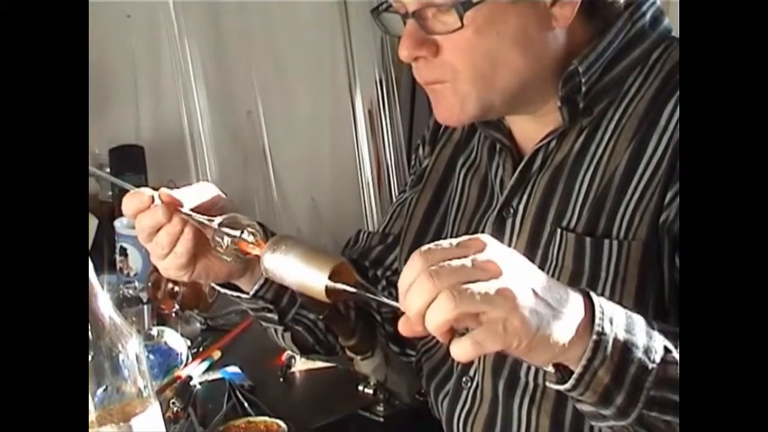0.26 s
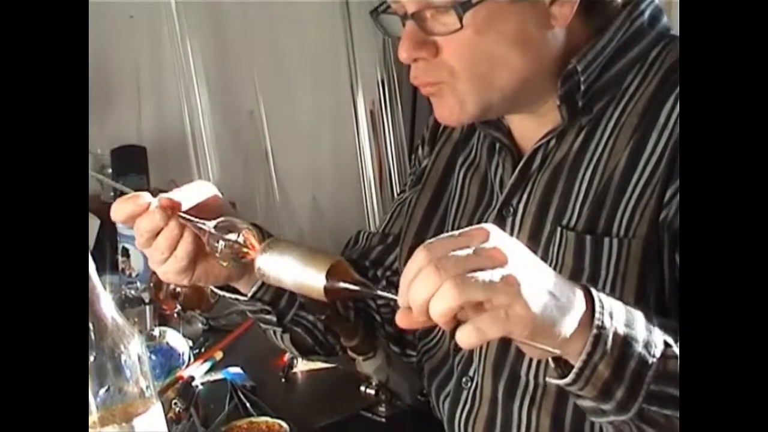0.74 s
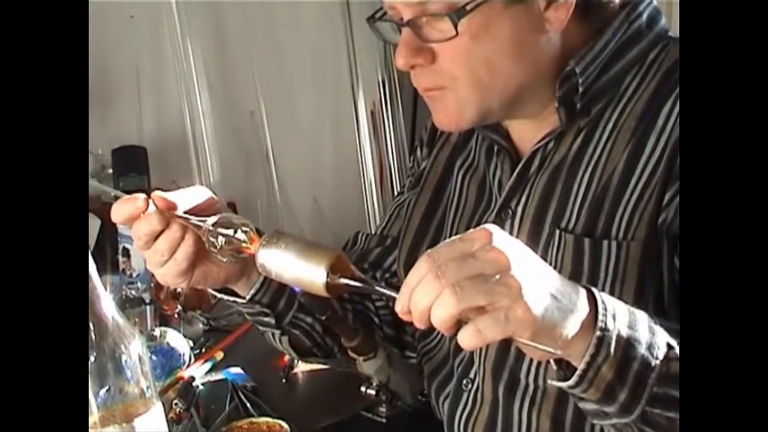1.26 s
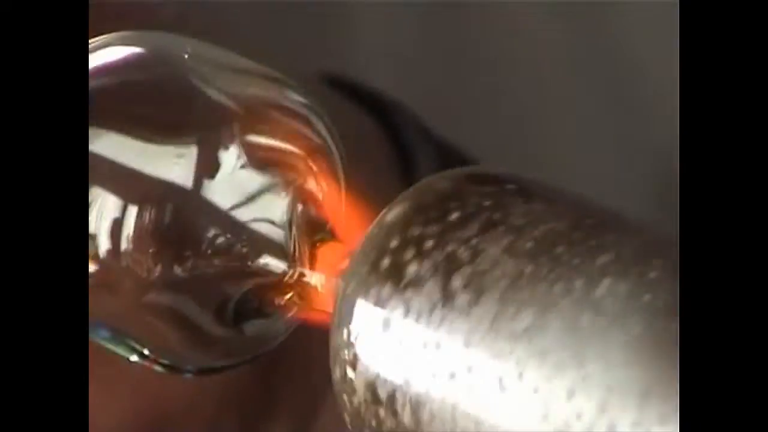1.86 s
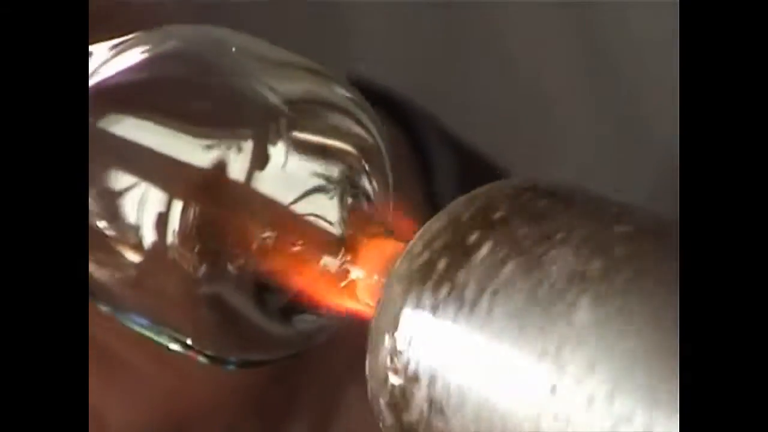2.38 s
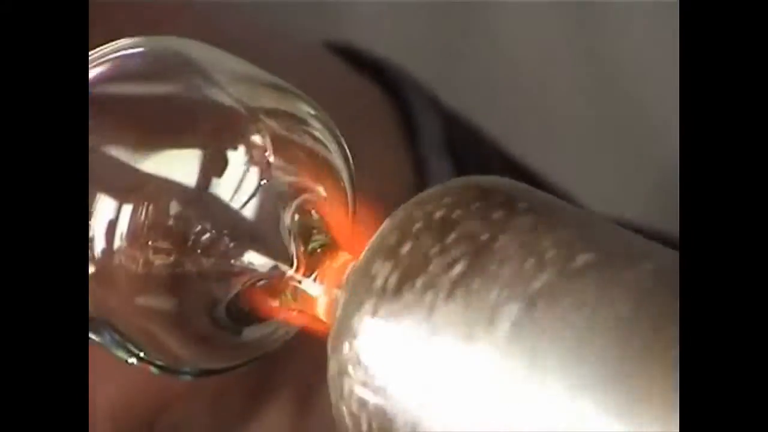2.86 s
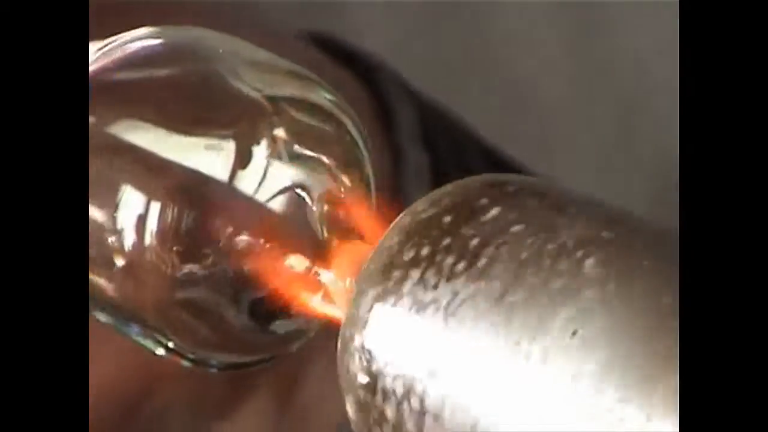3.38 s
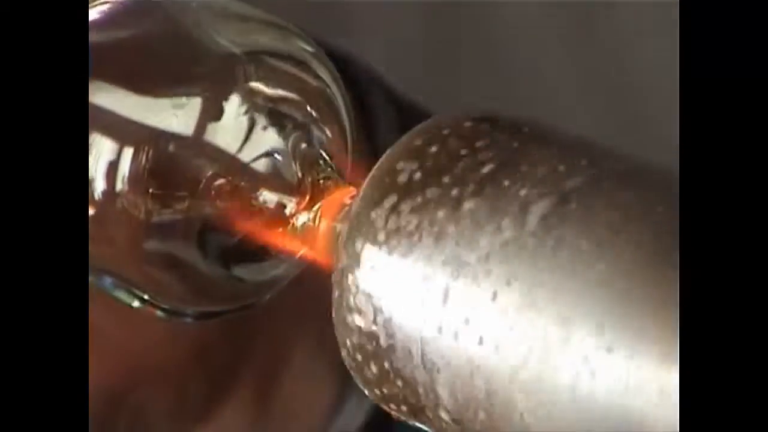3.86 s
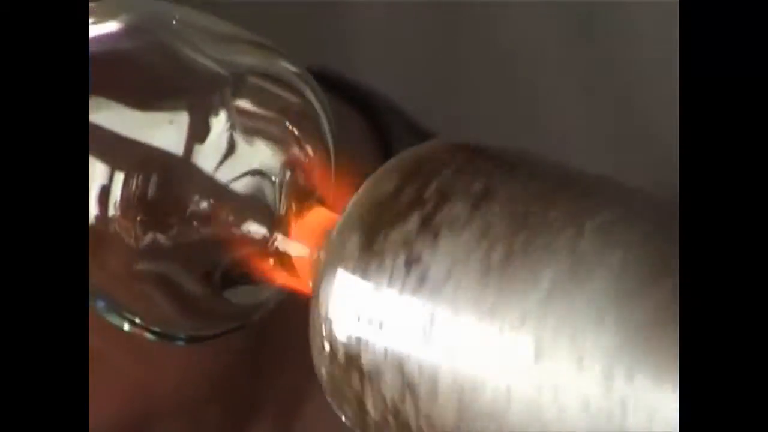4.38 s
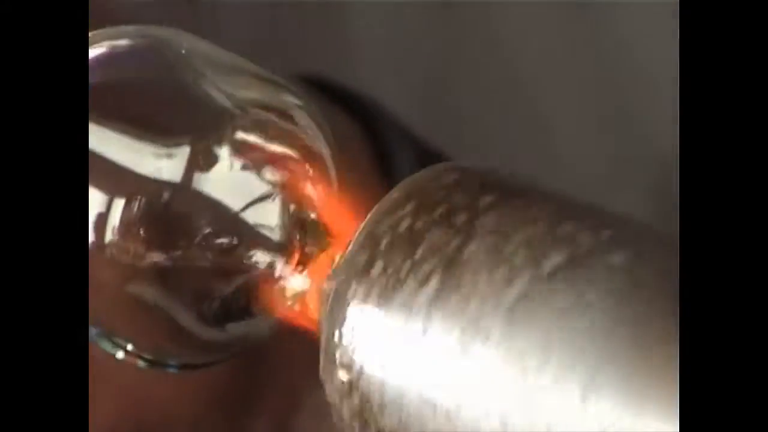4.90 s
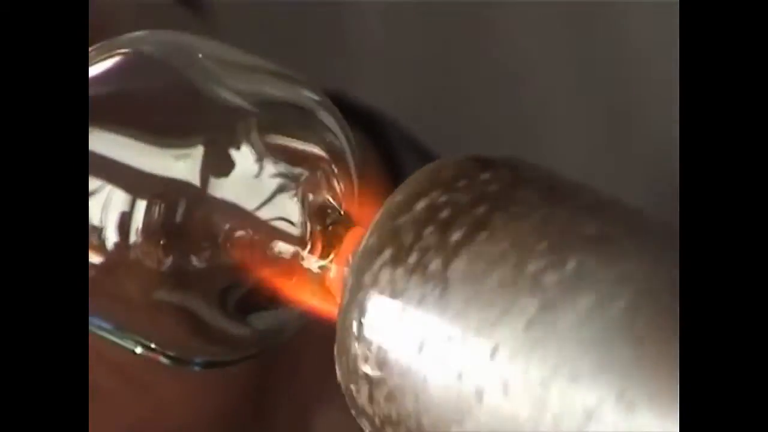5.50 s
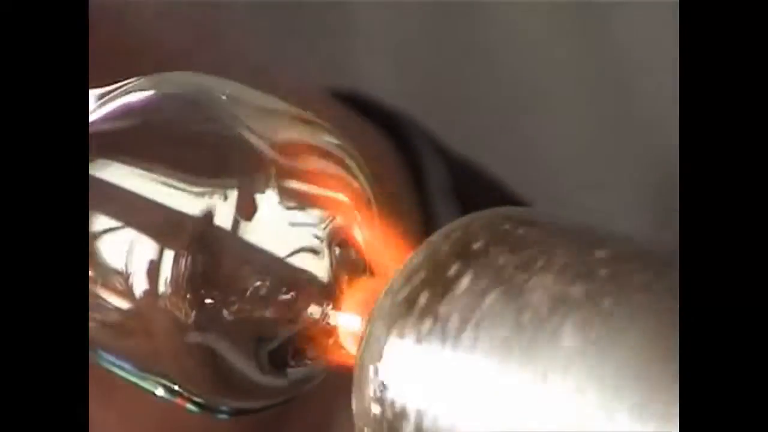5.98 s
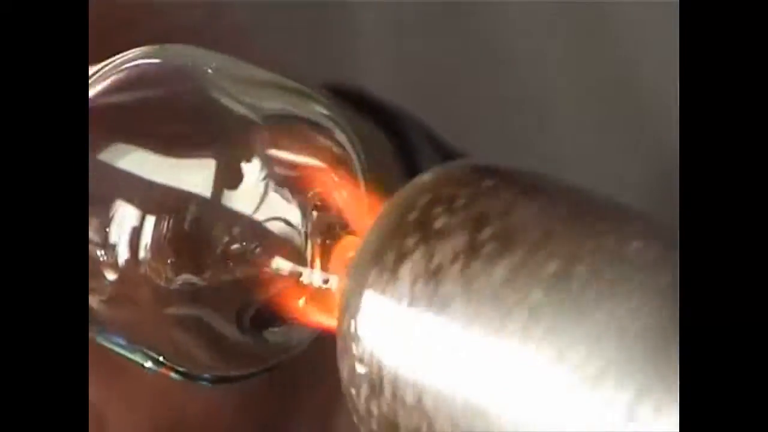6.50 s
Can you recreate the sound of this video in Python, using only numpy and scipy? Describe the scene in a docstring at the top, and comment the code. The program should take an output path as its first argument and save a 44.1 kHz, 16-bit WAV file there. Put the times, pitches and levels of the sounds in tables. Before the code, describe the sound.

A bench torch burns close by in a small workshop. For the first half second the flame flutters in uneven, low, breathy puffs, then stops fluttering and leaves a clean gas hiss. The hiss grows evenly until nearly two seconds and stays steady, bright and slightly whistly, over a very soft low roar. Two faint glassy touches and a tiny flare pass within it. Close stereo microphones.

```python
"""Gas torch on a glass bulb

A bench torch plays on a glass bulb in a small workshop, close to two microphones.
The flame flutters for half a second: noise bands lifted by puffs. Then it burns clean: jets hiss as shaped noise
and ring the cavities of torch head and glass over a soft low roar; their level rises evenly, then stays steady.
The flame splits on the turning bulb as two trading noise bands. Short noise swells make the flares;
two grazing touches ring the glass faintly as wandering sines."""
import sys
import numpy as np
from scipy import signal
from scipy.fft import rfft, irfft
from scipy.io import wavfile
from scipy.ndimage import uniform_filter1d

SR = 44100
rng = np.random.default_rng(int(sys.argv[2]) if len(sys.argv) > 2 else 0)


def store_pcm(level_fs):
    """Save levels as 16-bit WAV."""
    pcm = np.round(np.clip(level_fs, -1, 1) * 32767).astype(np.int16)
    wavfile.write(sys.argv[1], SR, np.atleast_2d(pcm).T)


N = 297407
T = np.arange(N) / SR
HZ = np.maximum(np.arange(N // 2 + 1) * SR / N, 1)
TOP_HZ = 15620


def undb(db):
    """Decibels to gain."""
    return 10 ** (np.asarray(db) / 20)


def unit(x):
    """Scale to rms 1."""
    return x / np.sqrt(np.mean(x ** 2))


def across(points):
    """(frequency [Hz], value) points joined on a log-frequency axis."""
    hz, value = np.transpose(points)
    return np.interp(np.log(HZ), np.log(hz), value)


def resonances(modes):
    """Gain of steep-skirted (frequency [Hz], width [Hz], level [dB]) modes, summed in power."""
    power = 0
    for hz, width_hz, db in modes:
        offset = (HZ - hz) / (0.86 * width_hz)
        power = power + (undb(db) / (1 + offset ** 2)) ** 2
    return np.sqrt(power)


def walk(rate_hz):
    """Smooth random drift: noise low-passed to half gain at rate_hz; rms 1."""
    spectrum = rfft(rng.standard_normal(N))
    return unit(irfft(spectrum / (1 + (HZ / rate_hz) ** 4), N))


def ramp(start_s, length_s):
    """An even rise from 0 to 1."""
    return np.clip((T - start_s) / length_s, 0, 1)


def swell(top_s, length_s):
    """A Gaussian bump in time, down to 1/e at length_s either side."""
    return np.exp(-((T - top_s) / length_s) ** 2)


def surge(start_s, rise_s, length_s):
    """A quick rise from start_s, then a Gaussian fall."""
    return ramp(start_s, rise_s) * swell(start_s + rise_s, length_s)


def reflections(t60_s, share, full_hz=2500):
    """Fine spectral ripple that echoes from bench and walls put on the treble at each microphone."""
    tail = rng.standard_normal((2, N)) * undb(-60 * T / t60_s) * (T > .002)
    tail /= np.sqrt(np.sum(tail ** 2, axis=1, keepdims=True))
    echo = share * np.minimum(HZ / full_hz, 1) ** .5
    return np.abs(1 + echo * rfft(tail)) / np.sqrt(1 + echo ** 2)


# phase by which the left microphone leads: (frequency [Hz], lead [rad])
LEAD = [(60, 0.5), (250, -1), (500, -1.1), (1000, 0.56), (1650, -1), (1850, 0), (5900, -1), (6700, 1),
        (7450, 0.5), (8600, 0.44), (9600, 0), (10500, 1.4), (11900, 2), (12700, 2.5), (13600, -0.5),
        (15500, -1)]


def turbulence(colour, likeness, pan_db):
    """Stereo noise of given colour, left-right likeness (-1..1) and left-minus-right level; rms 1."""
    mid, side = rfft(rng.standard_normal((2, N)))
    likeness = np.clip(likeness, -.98, .98)
    sign = np.array([[1], [-1]])
    pair = np.sqrt(1 + likeness) * mid + sign * np.sqrt(1 - likeness) * side
    balance = undb(sign * pan_db / 2)
    phase = np.exp(1j * sign * across(LEAD) / 2)
    return unit(irfft(pair * colour * balance * phase, N))


# spectrum shape of the unsteady flame's rumble: (frequency [Hz], relative density [dB per Hz])
RUMBLE = [(20, -5), (60, -2), (130, -8), (175, 0.5), (290, -3), (400, -5), (600, -14), (1000, -19.5),
          (2000, -48)]
# strongest puffs of the unsteady flame: (start [s], fall to 1/e [s], lift before growth [dB])
PUFFS = [(0.053, 0.028, 2.5), (0.12, 0.07, 3.5), (0.205, 0.05, -0.8), (0.286, 0.047, 4),
         (0.322, 0.057, 3.5), (0.364, 0.09, 4.5)]
PUFF_RISE_S = 0.006
FLUTTER_DB, FLUTTER_ATTACK_S, FLUTTER_END_S, FLUTTER_RELEASE_S = -57, 0.1, 0.498, 0.022
FLUTTER_SINKS_S, FLUTTER_SINK_DB_PER_S = 0.39, 43
# growth: dB gained per dB of puff lift
RAGGED_DB, RAGGED_GROWTH = -63, 2.2
BASS_DB, BASS_TOP_S, BASS_LENGTH_S = -62, 0.25, 0.11


def flutter(throb_db=1.6, rumble_growth=0.82, sputter_db=1.0):
    """The flame burns in sudden puffs, the stronger the brighter, heaves in the bass, sinks and stops."""
    lift_db = sum(db * surge(s, PUFF_RISE_S, length_s) for s, length_s, db in PUFFS)
    sink_db = FLUTTER_SINK_DB_PER_S * np.maximum(T - FLUTTER_SINKS_S, 0)

    rumble_likeness = across([(30, .5), (130, 0.97), (600, 0.87)])
    rumble_pan_db = across([(60, 6.5), (200, 3.9)])
    rumble = turbulence(undb(across(RUMBLE)), rumble_likeness, rumble_pan_db)
    rumble = rumble * undb(FLUTTER_DB + rumble_growth * lift_db - sink_db)

    ragged_shape_db = across([(300, -25), (600, -10), (1500, -7), (2500, -9), (5000, -12), (15000, -47)])
    ragged = turbulence(undb(ragged_shape_db), likeness=0.54, pan_db=3.0)
    ragged = ragged * undb(RAGGED_DB + RAGGED_GROWTH * lift_db + sputter_db * walk(70))

    bass = turbulence(resonances([(65, 50, 0)]), likeness=0.7, pan_db=6.5)
    bass = bass * undb(BASS_DB) * swell(BASS_TOP_S, BASS_LENGTH_S)

    attack = np.interp(T, [0, FLUTTER_ATTACK_S], [.4, 1])
    release = 1 - ramp(FLUTTER_END_S - FLUTTER_RELEASE_S, FLUTTER_RELEASE_S)
    return (rumble + ragged + bass) * undb(throb_db * walk(38)) * attack * release


# spectrum shape of the jets: (frequency [Hz], relative density [dB per Hz])
HISS = [(250, -35.5), (450, -21), (700, -19), (1400, -12.5), (1760, -10), (1970, -7), (2300, -8.5),
        (3200, -10), (5000, -6.5), (7000, -5), (9000, -6.5), (12000, -8), (13500, -9.5), (14800, -17.5),
        (15600, -12.5)]
# resonances of torch head, glass and bench: (frequency [Hz], width [Hz], relative level [dB])
CAVITIES = [(528, 22, -17.5), (766, 20, -12), (857, 10, -15), (942, 10, -8.3), (1040, 10, -10),
            (1072, 26, -9), (1115, 28, -11), (1287, 14, -9.5), (1370, 50, -9.5), (1462, 36, -8.5),
            (1589, 30, -13), (1786, 14, -10), (1888, 30, -6.3), (1966, 36, -1.2), (2033, 24, 0.5),
            (2152, 44, -3.2), (2304, 35, -7.5), (2632, 36, -1.8), (2810, 60, -4.8), (3015, 40, -5.8),
            (3186, 22, 0.5), (3308, 32, -1.8), (3490, 28, -2.5), (3565, 35, -5.5), (4030, 56, -2),
            (4378, 56, -4.6), (4554, 36, -5.4), (4711, 38, -4.2), (5290, 130, -9), (5850, 90, -8),
            (6020, 110, -2.5), (6390, 70, -7), (6800, 32, -0.5), (6955, 42, -2), (7026, 24, -4),
            (7260, 90, -3.2), (7385, 30, -2), (7554, 30, -5), (7721, 26, -5.5), (7848, 53, -2.6),
            (8328, 77, -4.6), (10444, 110, -5.8), (11586, 300, -10), (12180, 260, -8.5), (13320, 260, -11)]
# left-right likeness of the hiss: (frequency [Hz], likeness [-1..1])
LIKENESS = [(400, 0.66), (1350, 0.68), (1720, 0.16), (1950, 0.88), (2400, 0.73), (2800, 0.33), (3800, 0.86),
            (4700, 0.67), (6500, 0.57), (8600, 0.18), (9900, 0.48), (11000, 0.18), (12100, 0.38),
            (14000, 0.22), (15500, 0.41)]
# left-right balance of the jets: (frequency [Hz], left minus right [dB])
SIDES = [(60, 4), (110, 18), (200, 10), (380, 1.5), (700, 3.5), (1290, 3.5), (2380, 0), (4400, 1),
         (8120, 2.5), (15000, -1)]


def jets(room, ring_db=-4.0, tremble_db=0.5, ring_waver_db=0.52):
    """Gas hisses from the nozzles and rings the cavities nearby; both tremble together."""
    pan_db = across(SIDES)
    hiss = turbulence(undb(across(HISS)) * room, across(LIKENESS), pan_db)
    ring = turbulence(resonances(CAVITIES), likeness=0.78, pan_db=pan_db)
    ring = ring * undb(ring_db + ring_waver_db * walk(22.0))
    return unit(hiss + ring) * undb(tremble_db * walk(40))


# where the flame meets the bulb: (time [s], aim [0 = spread on its face, 1 = split on its edge])
AIM = [(0, .15), (1.65, 0.089), (2.1, 0.95), (2.9, 1.5), (5.2, 1.34), (5.5, 0.13), (6.74, 0.83)]
# the turning bulb wobbles through the flame: turn time, a moment nearest the edge, swing of aim
TURN_S, NEAREST_S, WOBBLE = 0.65, 3.34, 0.086


def splash(room, edge_hz=7250, edge_width_hz=450, edge_db=-7.5, edge_range_db=12,
           middle_hz=3300, middle_width_hz=1300, middle_db=-11, middle_range_db=4.5):
    """The flame splits on the turning glass: a narrow high edge band trades with a broader spread band."""
    wobble = WOBBLE * np.cos(2 * np.pi * (T - NEAREST_S) / TURN_S)
    aim = np.interp(T, *np.transpose(AIM)) + wobble
    edge_colour = resonances([(edge_hz, edge_width_hz, 0)]) * room
    edge = turbulence(edge_colour, likeness=0.41, pan_db=-5.0)
    middle_colour = resonances([(middle_hz, middle_width_hz, 0)]) ** 2 * room
    middle = turbulence(middle_colour, likeness=0.96, pan_db=1)
    edge = edge * undb(edge_db - edge_range_db * (3.0 - aim))
    return edge + middle * undb(middle_db - middle_range_db * aim)


def flicker(sound, low_db=1.0, high_db=2.5, size=512):
    """Narrow bands flicker up and down at random, alike in both channels, more deeply toward the treble."""
    hz, _, bands = signal.stft(sound, SR, nperseg=size)
    chance = rng.standard_normal(bands.shape[1:])
    chance = uniform_filter1d(chance, size=9, axis=1)  # over time
    chance = unit(uniform_filter1d(chance, size=5, axis=0))  # over frequency
    depth_db = low_db + (high_db - low_db) * (hz[:, None] / TOP_HZ) ** 2
    return signal.istft(bands * undb(depth_db * chance), SR, nperseg=size)[1][:, :N]


# spectrum shape of steady burning: (frequency [Hz], relative density [dB per Hz])
ROAR = [(20, -16), (38, -19), (54, -5.5), (75, -18), (98, -4.5), (120, -11), (150, -16), (168, 2),
        (220, 0.5), (250, -4), (280, 3), (320, -7.5), (370, 1), (440, -15.5), (800, -9), (2000, -23)]


def roar():
    """The low, even sound of burning, mostly on the left."""
    return turbulence(undb(across(ROAR)), likeness=0.86, pan_db=11.0)


# brief swells in the flame: (top [s], half-length to 1/e [s], centre [Hz], width [Hz], level [dB])
FLARES = [(0.3, 0.011, 200, 55, -52), (3.2, 0.013, 2900, 700, -48), (3.252, 0.02, 3350, 300, -57),
          (3.22, 0.14, 50, 50, -76), (3.84, 0.037, 110, 90, -68), (5.164, 0.012, 7000, 7000, -42)]


def flares():
    """Now and then one band of the flame's noise swells and falls back."""
    total = 0
    for s, length_s, hz, width_hz, db in FLARES:
        band = turbulence(resonances([(hz, width_hz, 0)]), likeness=0.85, pan_db=5)
        total = total + band * undb(db) * swell(s, length_s)
    return total


# ring of the glass: (frequency [Hz], relative level [dB])
GLASS = [(2628, 3), (3187, -3.5)]
# touches that ring the glass: (start [s], fall to 1/e [s], level [dB])
TOUCHES = [(3.168, 0.028, -49.5), (4.18, 0.033, -51)]


def glass(rise_s=0.0098, rough=0.2, wander_hz=7):
    """A grazing touch rings the blown glass as sines, rough in level and wandering in pitch."""
    ring = 0
    for hz, db in GLASS:
        roughness = 1 + rough * walk(120)
        phase = 2 * np.pi * np.cumsum(hz + wander_hz * walk(103)) / SR
        ring = ring + undb(db) * roughness * np.sin(phase)
    return ring * sum(undb(db) * surge(s, rise_s, length_s) for s, length_s, db in TOUCHES)


# hiss level: low at first, rises evenly in amplitude, then stays steady
LOW_DB, STEADY_DB, RISE_START_S, RISE_LENGTH_S = -47.3, -41.2, 0.53, 1.3


def scene(hiss_db=1.5, roar_db=-22.5, roar_rise_db=0.8, waver_db=0.24):
    """One rising, slightly wavering level carries hiss, splash and roar together; the roar rises most."""
    rise = ramp(RISE_START_S, RISE_LENGTH_S)
    low, steady = undb(LOW_DB), undb(STEADY_DB)
    level = (low + (steady - low) * rise) * undb(waver_db * walk(1.8))
    room = reflections(t60_s=0.2, share=0.59)
    hissing = flicker(undb(hiss_db) * jets(room) + splash(room))
    roaring = undb(roar_db - roar_rise_db * (1 - rise)) * roar()
    return flutter() + (hissing + roaring) * level + flares() + glass()


def record(dry):
    """A steep elliptic low-pass removes the top above TOP_HZ."""
    low_pass = signal.ellip(12, .1, 85, TOP_HZ, fs=SR, output="sos")
    return signal.sosfilt(low_pass, dry)


dry = scene()
out = record(dry)
store_pcm(out)
```